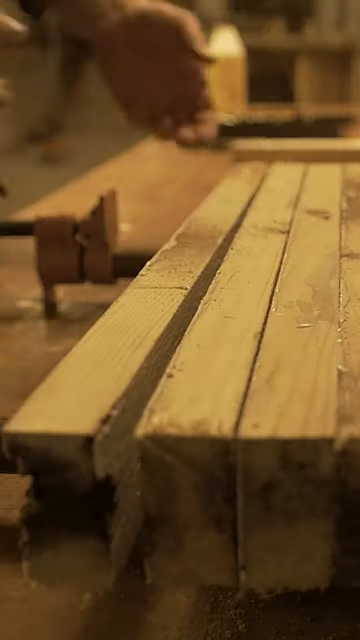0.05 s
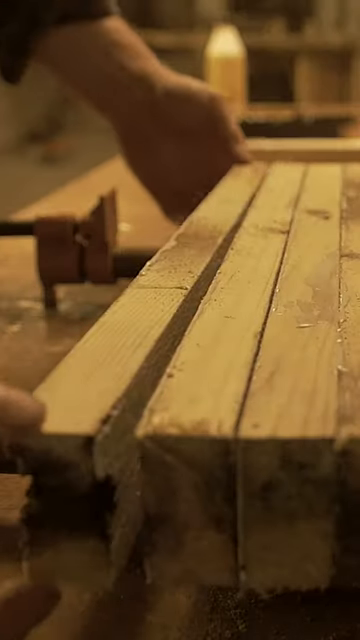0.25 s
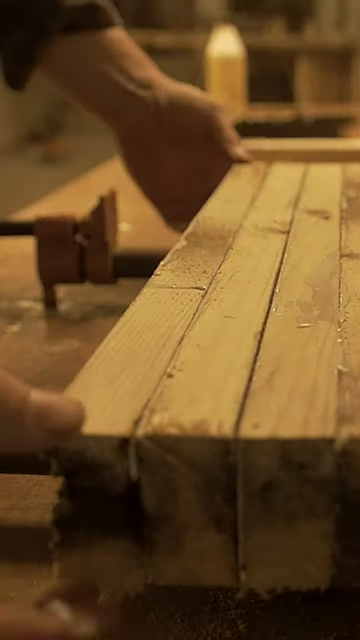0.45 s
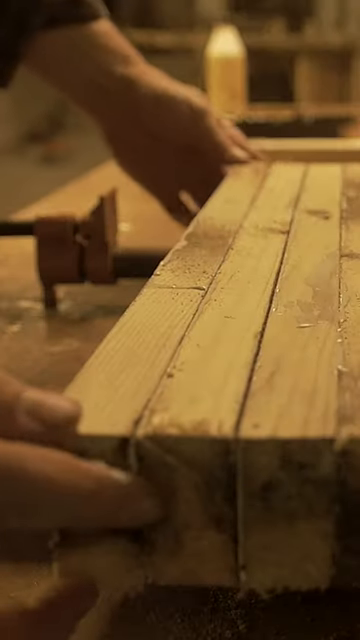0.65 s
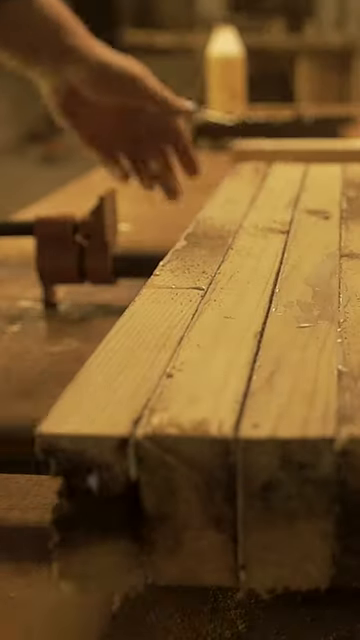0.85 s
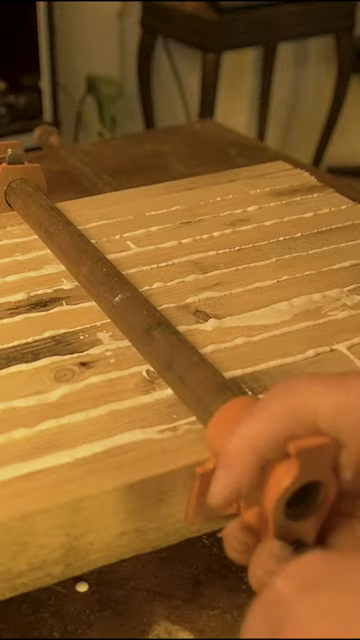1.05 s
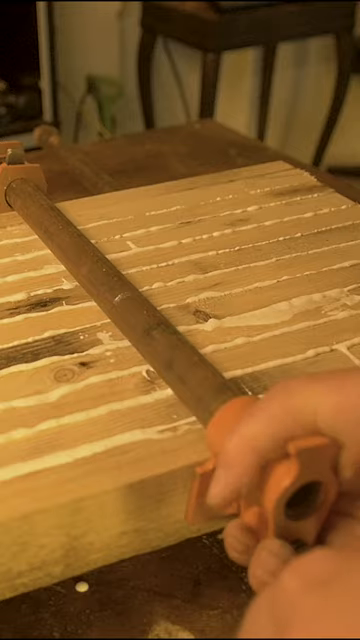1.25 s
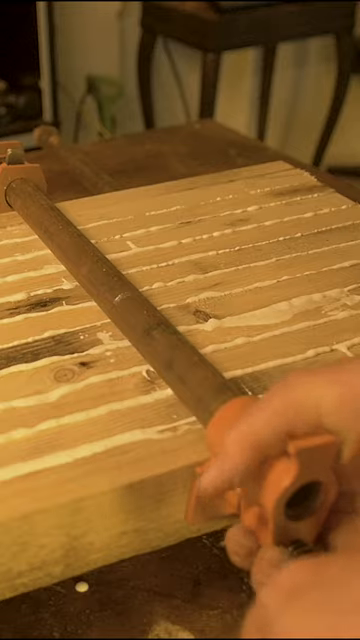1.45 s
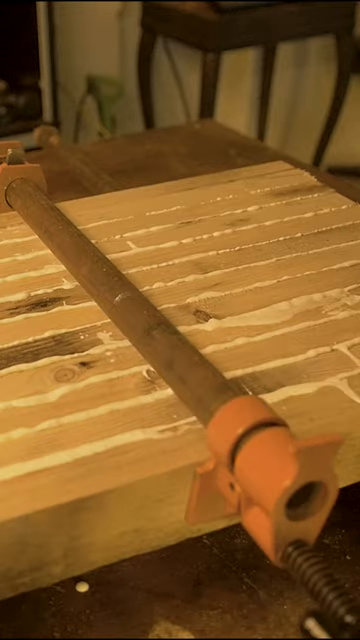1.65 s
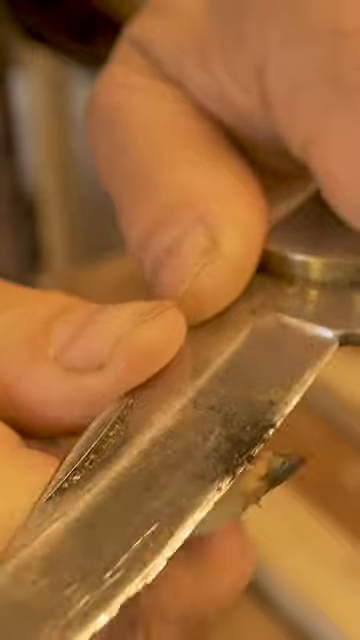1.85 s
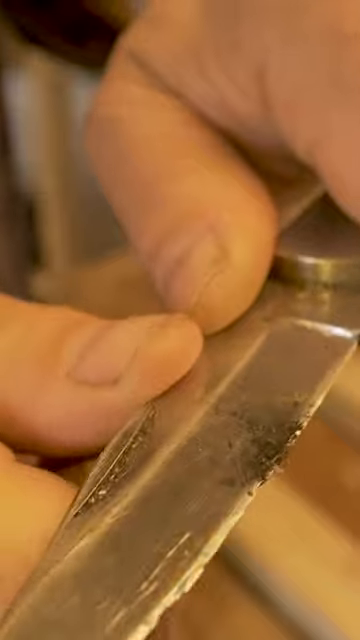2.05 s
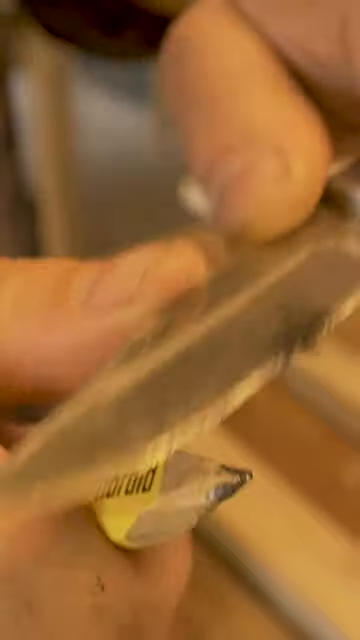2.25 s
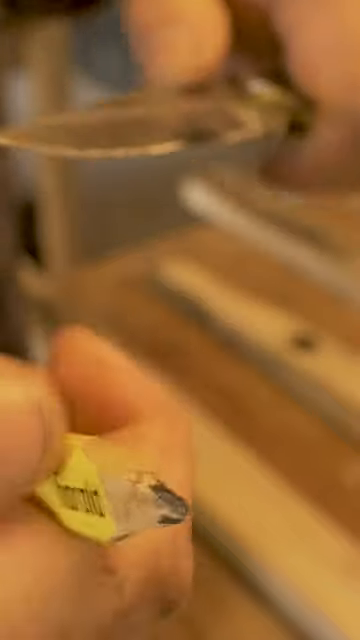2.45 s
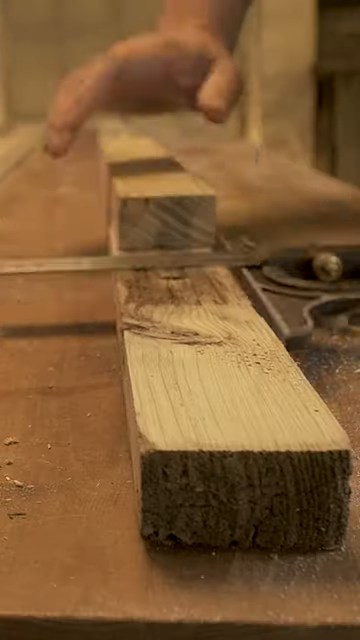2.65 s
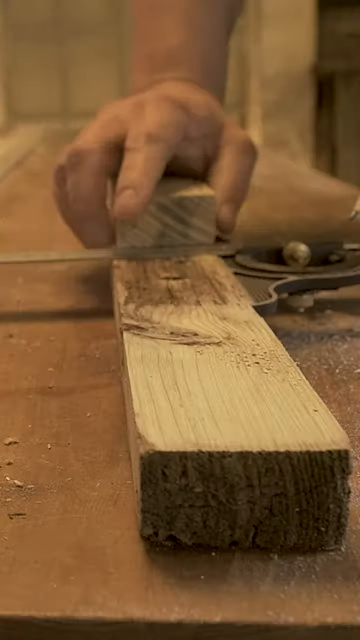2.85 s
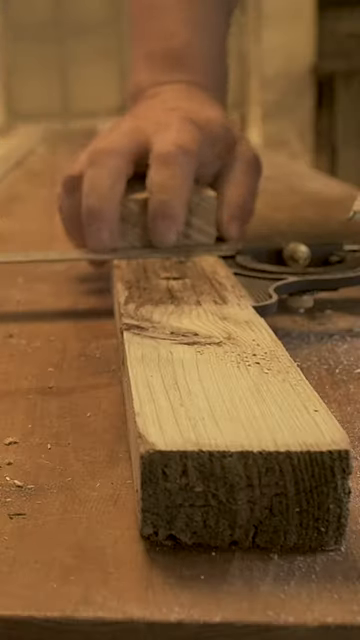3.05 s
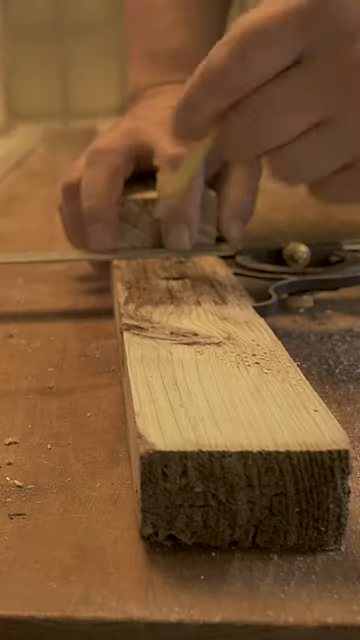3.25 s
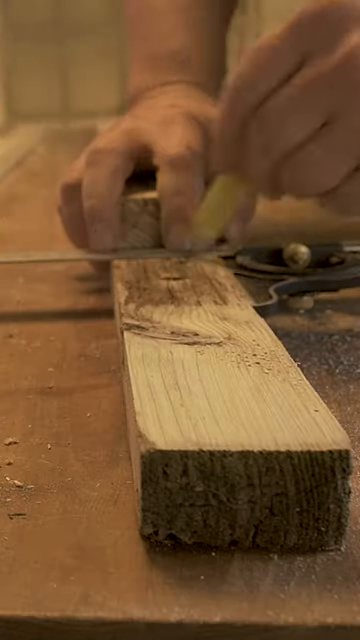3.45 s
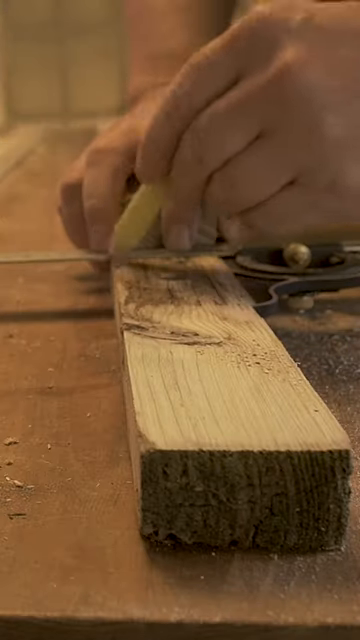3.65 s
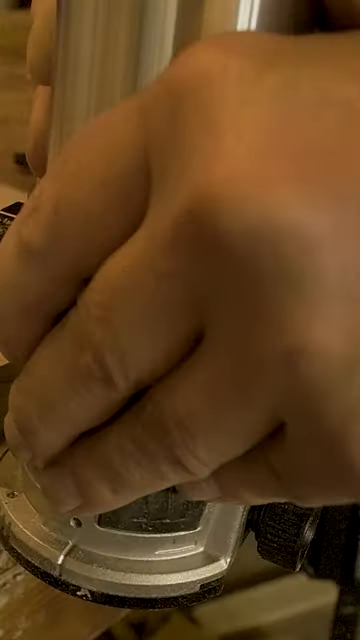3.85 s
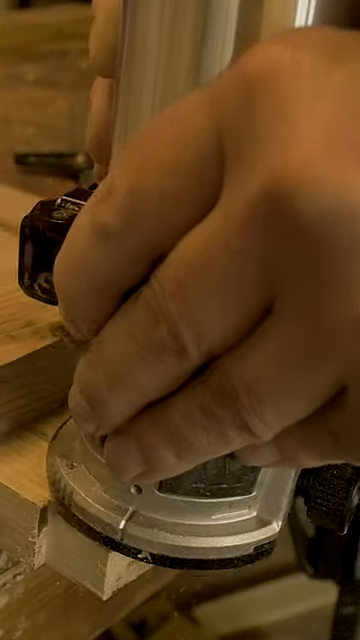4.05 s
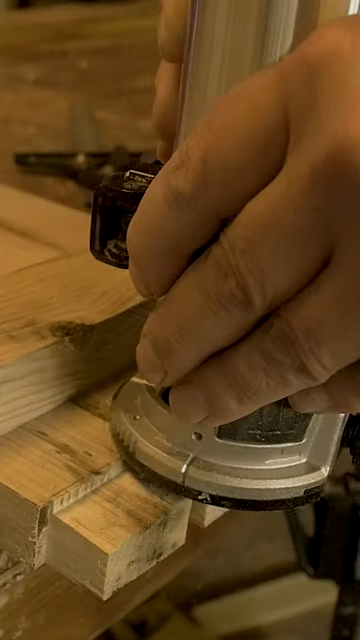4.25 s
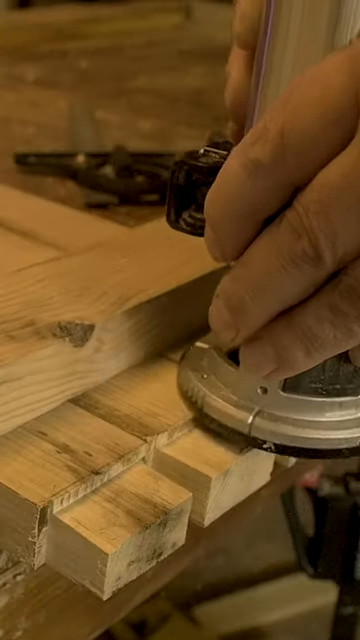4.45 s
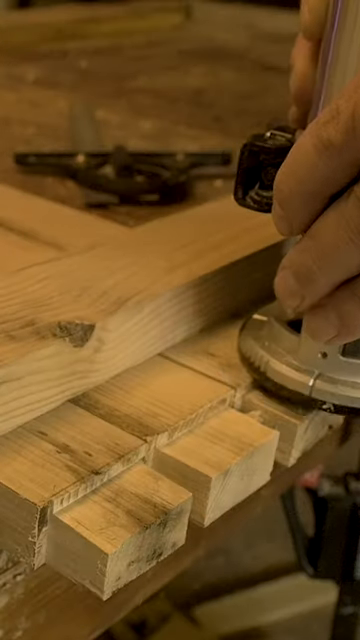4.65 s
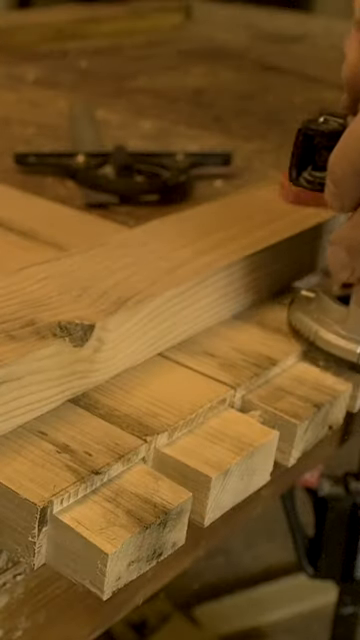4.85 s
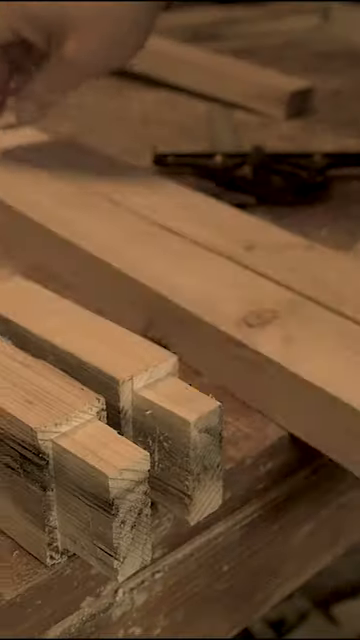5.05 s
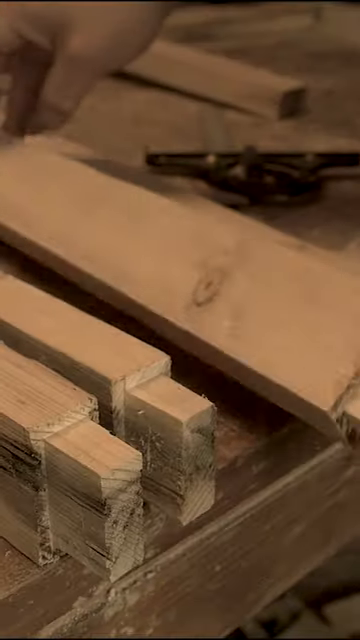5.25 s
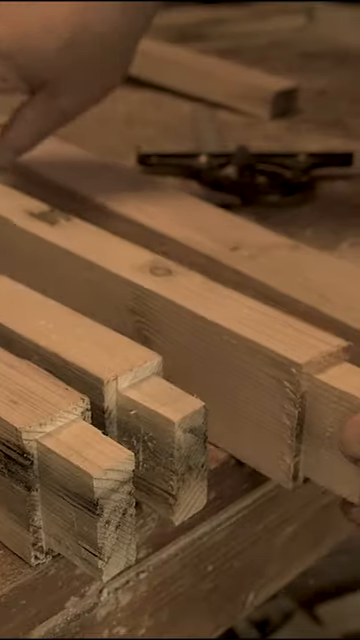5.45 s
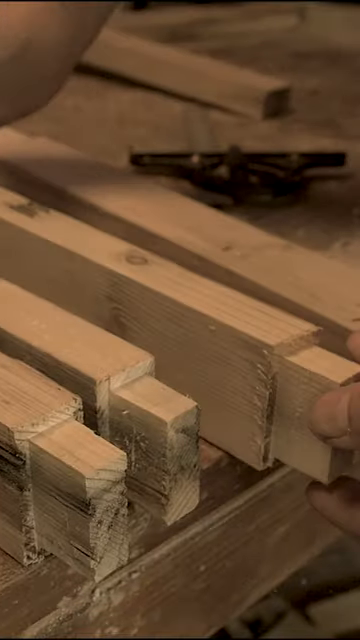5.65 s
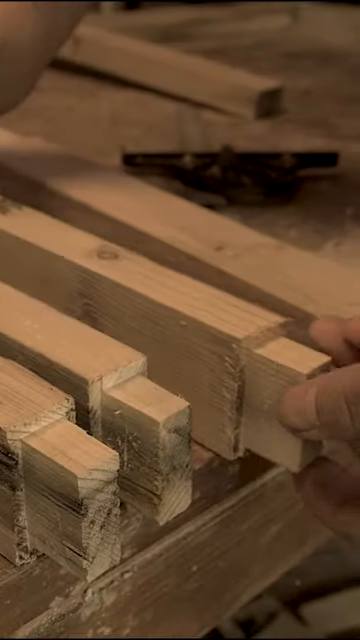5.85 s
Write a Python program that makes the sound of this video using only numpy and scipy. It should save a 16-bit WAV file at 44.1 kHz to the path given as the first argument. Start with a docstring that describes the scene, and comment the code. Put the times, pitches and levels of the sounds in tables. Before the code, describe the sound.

Soft timber thuds, clicks and sharp knocks under twittering birds, a hard cut to a whining router, then a heavy wooden clatter.

```python
"""Timber workshop with an open door

Boards, clamps and tools are handled close by in short work steps joined by hard cuts: rough pushes ring the
modes of a beam and of small parts. Timber drags, a router roars past over whining shaft multiples, and a
beam drops on the bench. Birds outside sing sine slides blurred by echoes, except during the router step;
shaped noise gives the low rumble, air, far birds and hiss, and a faint hum colours the first step.
"""
import sys
import numpy as np
from scipy import signal
from scipy.fft import rfft, irfft
from scipy.io import wavfile
from scipy.ndimage import uniform_filter1d, map_coordinates

SR = 44100
rng = np.random.default_rng(int(sys.argv[2]) if len(sys.argv) > 2 else 0)


def to_wav(s):
    """Save 16-bit WAV."""
    ch = np.atleast_2d(s).T  # columns
    pcm = np.round(np.clip(ch, -1, 1) * 32767)  # PCM
    wavfile.write(sys.argv[1], SR, pcm.astype(np.int16))


N = 261072
TIME = np.arange(N) / SR   # s

# Jumps to the next work step, where ringing stops. Each entry: time in seconds.
CUTS = [.975, 3.7765, 5.079]

# Background air. One list per work step; each row: time in seconds, then the relative levels of the
# far bird chorus, room air, hiss and low murmur, all in dB.
AIR = [
    [(0.0, -58.5, -57.5, -58, -79), (0.552, -62.5, -62, -64, -74.5), (0.96, -60, -61, -63.5, -80)],
    [(0.99, -65, -60.5, -60, -56.5), (1.42, -69, -61.5, -60.5, -56), (1.59, -60, -60, -55, -62),
     (2.36, -55.5, -61, -60, -61.5), (2.67, -65.5, -58, -55, -59), (3.03, -53.5, -62.5, -61, -68.5),
     (3.47, -61, -61.5, -56.5, -58.5)],
    [(5.09, -59, -49.5, -51.5, -71), (5.434, -51, -64.5, -60, -35.5), (5.92, -51.5, -53, -58, -68)],
]
# Colour of the background. Each row: frequency in Hz, relative level in dB per Hz.
OUTDOORS = [(20, -13), (91, -3), (297, -5), (368, -9), (848, -7.5), (1900, -11), (3930, -8.5), (5880, -17),
            (15500, -25.5)]
# Likeness of the two microphones in the background. Each row: frequency in Hz, left-right likeness from -1 to 1.
LIKENESS = [(60, 0.67), (240, 0.42), (950, 0.36), (3770, 0.14), (15000, -0.21)]
RUMBLE_DB = -63.5
HUM_HZ, HUM_DB = 385, -71.5   # a faint hum and its octave in the first step

# Nearer bird notes. Each row: start in seconds, shape, relative level in dB.
NOTES = [(0.293, "drop", -60.5), (0.324, "drop", -62.5), (.385, "lift", -64), (.595, "rise", -66),
         (.675, "pip", -75), (1.585, "slide", -64), (1.531, "lift", -57), (1.622, "lift", -54.5),
         (1.9, "hold", -75), (2.28, "hold", -62), (2.545, "drop", -66), (2.465, "sweep", -72),
         (2.19, "warble", -59.5), (2.94, "warble", -63), (3.055, "chip", -58.5), (3.175, "chip", -62),
         (2.045, "sweep", -64), (2.172, "sweep", -63), (2.106, "slide", -56), (2.213, "slide", -61),
         (2.31, "climb", -60.5), (2.355, "whistle", -62), (2.425, "chip", -58), (2.497, "whistle", -60),
         (2.505, "slide", -59), (2.618, "slide", -60.5), (2.691, "lift", -58.5), (2.758, "rise", -62),
         (2.825, "lift", -58), (2.902, "rise", -59.5), (2.994, "lift", -58.5), (3.043, "rise", -57.5),
         (3.093, "slide", -59.5), (3.229, "lift", -60.5), (3.344, "lift", -61), (5.09, "pip", -59),
         (5.144, "drop", -53.5), (5.205, "pip", -59), (5.261, "drop", -54), (5.463, "chip", -53),
         (5.505, "chip", -51.5), (5.535, "whistle", -64), (5.668, "whistle", -55.5), (5.601, "chip", -53),
         (5.723, "drop", -55), (5.74, "pip", -66), (5.79, "drop", -65), (5.866, "lift", -55.5),
         (5.865, "pip", -63)]
# Shapes of bird notes. Each name: length in seconds, start pitch in Hz, end pitch in Hz.
NOTE_SHAPES = {"drop": (0.034, 5500, 3200), "slide": (0.025, 6800, 4300), "rise": (0.0244, 5280, 6650),
               "lift": (0.0325, 3750, 4500), "pip": (0.024, 6950, 6820), "warble": (0.08, 4150, 4400),
               "chip": (0.026, 3800, 3680), "whistle": (0.0367, 4800, 5250), "sweep": (0.022, 8000, 6200),
               "climb": (.055, 5050, 5750), "hold": (0.134, 3780, 3900)}
FLOCK_DB = -6.5   # the whole far flock, echoes included

# Workshop echoes: fade time of the bass, level, and pitch above which they die sooner
SHOP_T60_S, SHOP_DB, SHOP_DULL_HZ = 0.15, -8, 2520

# Contacts on wood. Each row: start in seconds, kind, wood level in dB, scuff hiss level in dB,
# fade in ms, favoured beam pitch in Hz.
CONTACTS = [(0.104, "tick", -30, -49, 15.5, 640), (0.188, "scuff", -52, -36.5, 25.6, 587),
            (0.804, "tick", -36.5, -56, 7.3, 1040), (0.839, "tick", -44, -53.5, 11, 295),
            (0.964, "rap", -32, -47, 3.9, 480), (1.03, "thud", -34.5, -59, 32, 302),
            (1.062, "thud", -40, -62, 22, 348), (1.113, "thud", -30, -68, 42, 306),
            (1.389, "knock", -16, -32, 14.8, 540), (1.438, "tick", -36.5, -51.5, 49, 775),
            (1.546, "thud", -36, -59, 26, 317), (1.756, "thud", -33.5, -54, 18, 245),
            (1.791, "tick", -36.5, -36.5, 26, 740), (1.814, "tick", -35, -45, 29, 770),
            (2.092, "scuff", -62, -39.5, 19, 304), (2.273, "scuff", -61, -44.5, 22, 300),
            (2.588, "thud", -25.5, -46, 13.6, 160), (2.614, "scuff", -33, -54, 30, 200),
            (2.664, "thud", -26, -54, 6.2, 156), (2.78, "thud", -21, -52, 6.5, 173),
            (2.781, "tick", -39, -62, 24, 404), (2.814, "knock", -31.5, -57, 5.8, 420),
            (3.494, "rap", -30.5, -31.5, 13, 760), (3.508, "knock", -15.5, -32.5, 11, 394),
            (3.525, "tick", -18, -37, 17, 250), (3.535, "tick", -34, -23, 13.2, 472),
            (3.619, "rap", -31.5, -35.5, 7.9, 594), (3.643, "tick", -32, -58, 8.1, 284),
            (3.705, "knock", -40, -52, 61, 400), (3.74, "thud", -22, -42, 30, 385),
            (3.758, "knock", -10, -36, 22, 408), (5.224, "thud", -33, -42, 16, 620),
            (5.341, "drop", 3.5, -30, 17.6, 361), (5.385, "drop", -8, -38.5, 29, 352),
            (5.41, "drop", -6.5, -40, 21, 418), (5.48, "drop", -21, -50, 30, 607)]
# Kinds of contact. Each name: share to the beam in dB, share to the small parts in dB, rise in ms,
# focus on the favoured beam pitch in dB per octave.
KINDS = {"tick": (-36, 4.5, 4.5, 7), "thud": (-1.5, -58, 4, 34.5), "rap": (3, 5.9, 4, 41),
         "knock": (0.5, -4, 23.5, 14), "scuff": (-21, -11.5, 8, 31), "drop": (2, -12.5, 12, 18.5)}
# Modes of the beam. Each row: frequency in Hz, relative level in dB, free ring time (t60) in seconds.
BEAM = [(159, -6, 0.31), (211.3, 1, 0.2), (312, -6.5, 0.38), (354, 2, 0.18), (382.5, -2.5, 0.2),
        (481.5, 0, 0.12), (560, -4.5, 0.29), (617, -6, 0.36), (830, -11, .3)]
# Modes of blocks, jaws and tools. Each row: frequency in Hz, relative level in dB, free ring time in seconds.
SMALL_PARTS = [(866, 2.5, 0.091), (1103, 9, 0.047), (1336, 5, 0.061), (2200, -4.5, 0.027),
               (2475, 8.5, 0.022), (4540, 15, 0.031)]
# Colour of the scuff hiss. Each row: frequency in Hz, relative level in dB per Hz.
SCUFF = [(880, -65), (1500, 6.5), (1840, 3.5), (5190, -5), (11300, -4.5), (15500, -17)]
BEAM_DAMPING, PART_DAMPING = .25, .28   # share of the free ring time left when hands and bench hold the wood
LOOSE_RING, LOOSE_HZ = 2.6, 1346   # a dropped beam rings this many times longer and favours this part pitch
# The bench booms densely under a dropped beam: level below the wood, fade time, band edges
BENCH_DB, BENCH_T60_S, BENCH_HZ = -19, 0.54, (189, 704)

# Timber dragged over the bench. Each row: start in seconds, end in seconds, relative beam rumble at the start
# in dB, at the end in dB, favoured pitch in Hz, rub in the small parts in dB.
DRAGS = [(2.394, 3.299, -44.5, -52.5, 214, -74), (5.078, 5.211, -37, -43, 154, -86),
         (5.204, 5.37, -39, -47, 159, -49.5), (5.612, 5.766, -48, -40, 356, -51),
         (5.843, 5.921, -50, -24, 155, -49.5)]

# The router pass. Each row: time in seconds, relative air and cutter noise in dB, left-right difference in dB,
# shaft tone in dB, commutator whine in dB.
ROUTER = [(3.8, -30, 0.0, -38, -45), (4.3, -30, -1, -45, -44), (4.65, -30.5, -4.5, -52, -44),
          (4.8, -30.5, -3, -56.5, -42.5), (5.06, -31.5, -4, -53, -41)]
# Commutator whine. Each row: shaft multiple, relative level in dB.
WHINE = [(8, -6), (12, 0), (16, -6), (24, -4)]
# Colour of the router's roar. Each row: frequency in Hz, relative level in dB per Hz.
ROAR = [(150, -50), (445, -37), (490, -15.5), (894, -9.5), (2600, -1.5), (3350, -6), (5650, -8.5),
        (10700, -6), (14300, -16.5)]
# Housing resonances in the roar. Each row: frequency in Hz, width in Hz, mean level in dB.
HOUSING = [(875, 6.4, -24), (1283, 20, -22), (1760, 260, -10), (2930, 59, -16), (3255, 28, -14)]
# Squeals under load. Each row: middle in seconds, length in seconds, multiple of the cutting rate, mean level in dB.
SQUEALS = [(4.25, .26, 10, -42), (4.81, .24, 18, -39), (4.79, .12, 19, -38), (4.91, .08, 19, -39),
           (4.93, .12, 21, -42)]
SHAFT_HZ = 496.7
CUTTER_HZ, CUTTER_REPEAT = 493.5, .3   # the treble of the roar partly repeats itself each turn
LEFT_LEAD_MS = (-1.03, 0.784)   # lead of the left microphone at the start and the end of the pass
# A dull reflection off the beams (gain, delay at both ends) cuts valleys that move up along the pass
GLANCE, GLANCE_MS = -.45, (.44, .37)
# Narrow bands flare up in the cut: level against the roar colour, width, swing, rate of change
GRAIN_DB, GRAIN_WIDTH_HZ, GRAIN_SWING_DB, GRAIN_PER_S = -15, 24, 5, 14

NOTCH_HZ, NOTCH_WIDTH_HZ = 7855, 70   # dip in the microphone's treble
CUTOFF_HZ = 15900


def amp(db):
    """dB to gain."""
    return 10 ** (np.asarray(db) / 20)


def rms_one(x):
    """Scaled to rms 1 over the last axis-free whole."""
    return x / np.sqrt(np.mean(x ** 2) + 1e-20)


def in_time(rows, outside=-120):
    s, *columns = np.transpose(rows)
    return np.array([np.interp(TIME, s, column, outside, outside) for column in columns])


def at_hz(points, hz):
    """A spectrum read on a log-frequency axis."""
    point_hz, value = np.array(points).T
    return np.interp(np.log(np.maximum(hz, 1)), np.log(point_hz), value)


def drift(rate):
    """Smooth chance of spread near 1, with this many random knots per second."""
    knots = rng.standard_normal(int(N / SR * rate) + 3)
    return map_coordinates(knots, [TIME * rate], order=3)


def coloured(spectrum, low_hz=20, high_hz=16000, channels=2):
    """Unrelated noises shaped by a spectrum inside soft edges, scaled to rms 1."""
    hz = np.arange(N // 2 + 1) * SR / N + 1e-3
    edges = np.sqrt((1 + (low_hz / hz) ** 8) * (1 + (hz / high_hz) ** 8))
    shape = amp(at_hz(spectrum, hz)) / edges
    return rms_one(irfft(rfft(rng.standard_normal((channels, N))) * shape, N))


def spread(pair):
    """Two unrelated noises become left and right, alike in the bass."""
    mid, side = rfft(pair)
    alike = np.clip(at_hz(LIKENESS, np.arange(len(mid)) * SR / N), -.95, .95)
    shared = np.sqrt((1 + alike) / 2) * mid
    opposed = np.sqrt((1 - alike) / 2) * side * [[1], [-1]]
    return irfft(shared + opposed, N)


def background():
    """Rumble, murmur, air, the blur of the farthest birds and hiss are slowly wavering noise; the hum is two sines."""
    chorus_db, air_db, hiss_db, low_db = in_time(sum(AIR, []), None)
    chorus = coloured(OUTDOORS, 2800., 5600.) * amp(chorus_db - 8 + 3 * drift(14))
    rumble = coloured(OUTDOORS, 5.8, 94.0) * amp(RUMBLE_DB + 2.0 * drift(4.17))
    low = coloured(OUTDOORS, 92.0, 444.0) * amp(low_db + 3.1 * drift(11.0))
    air = coloured(OUTDOORS, 420.0, 2870.0) * amp(air_db + 1.0 * drift(9.5))
    hiss = coloured(OUTDOORS, 4180.0) * amp(hiss_db + 2.3 * drift(16.0))
    turn = 2 * np.pi * HUM_HZ * TIME
    hum = amp(HUM_DB + 3 * drift(8)) * (np.sin(turn) + np.sin(2 * turn)) * (TIME < CUTS[0])
    return hum + spread(rumble + low + air + chorus + hiss)


def shop_echoes():
    """Dense echoes, unrelated left and right; the treble dies sooner."""
    t = np.arange(int(.6 * SR)) / SR
    noise = rng.standard_normal((2, len(t))) * np.minimum(t / 0.0057, 1)
    dull = signal.sosfilt(signal.butter(1, SHOP_DULL_HZ, fs=SR, output="sos"), noise)
    tail = dull * amp(-60 * t / SHOP_T60_S) + (noise - dull) * amp(-60 * t / (0.4 * SHOP_T60_S))
    return tail / np.sqrt(np.sum(tail ** 2, axis=1, keepdims=True))


def shop(dry, echoes):
    """Direct sound plus the decaying echoes of the workshop."""
    wet = signal.fftconvolve(dry.mean(axis=0)[None], echoes, axes=1)
    return dry + amp(SHOP_DB) * wet[:, :dry.shape[1]]


def sing(notes):
    """Rows of start s, length s, start Hz, end Hz, relative dB become soft-ended, quavering sine slides."""
    out = np.zeros((2, N))
    for s, length, start_hz, end_hz, level_db in notes:
        u = np.linspace(0, 1, int(length * SR))   # progress through the note
        quaver = 1 + .03 * np.sin(2 * np.pi * (65 * length * u + rng.random()))
        hz = (start_hz + (end_hz - start_hz) * u) * quaver
        note = np.sin(np.pi * u) * np.sin(2 * np.pi * np.cumsum(hz) / SR)
        side_db = rng.normal(0, 0.31) * np.array([[1], [-1]])
        start = int(s * SR)
        out[:, start:start + len(u)] += amp(level_db + 8.5 + side_db) * note
    return out


def birds(echoes):
    """Nearer notes lean slightly to a side each; a far flock twitters at random; the shop's echoes smear all."""
    chorus_db = in_time(sum(AIR, []), None)[0]
    when, length, pitch, slide, loud = rng.random((1000, 5)).T
    when = when * (N / SR - .1)
    start_hz = 3600 + 900 * pitch
    end_hz = start_hz * (1 + 0.55 * (slide - .6))
    level_db = chorus_db[(when * SR).astype(int)] - 3 - 10 * loud
    flock = np.transpose([when, 0.01405 + 0.0284 * length, start_hz, end_hz, level_db])
    near = sing([(s, *NOTE_SHAPES[shape], db) for s, shape, db in NOTES])
    far = sing(flock)
    out = shop(near, 1.9 * echoes) + amp(FLOCK_DB) * shop(far, 1.6 * echoes)
    return out * ((TIME < CUTS[1]) | (TIME > CUTS[2]))   # none in the router step


def soften(x, hz):
    """A yielding contact pushes without treble."""
    return signal.sosfilt(signal.butter(3, hz, fs=SR, output="sos"), x)


def favour(modes, focus_hz, db_per_octave):
    """Where a board is struck decides which of its modes speak."""
    favoured = []
    for hz, level_db, t60 in modes:
        loss_db = min(db_per_octave * np.abs(np.log2(hz / focus_hz)), 26.0)
        favoured.append((hz, level_db - loss_db, t60))
    return favoured


def ring(push, modes, share, spread_db):
    """Every mode, a two-pole resonator, answers the push with a strength of its own at each microphone."""
    out = 0
    for hz, level_db, t60 in modes:
        r = amp(-60 / (t60 * share * SR))   # decay per sample
        w = 2 * np.pi * hz / SR
        gain = amp(level_db + spread_db * rng.standard_normal((2, 1)))
        out = out + gain * signal.lfilter([1, 0, -1], [1, -2 * r * np.cos(w), r * r], push + 1e-18)
    return out


def contacts(echoes):
    """Each contact is a rough push that swells and fades; it rings the beam and the small parts and scuffs."""
    out = np.zeros((2, N))
    hiss = coloured(SCUFF, 2010.0)
    ms = np.arange(int(.6 * SR)) / SR * 1000
    for s, kind, wood_db, scuff_db, fade_ms, focus_hz in CONTACTS:
        beam_db, part_db, rise_ms, focus_db = KINDS[kind]
        dropped = kind == "drop"
        start = int(s * SR)
        end = min([start + len(ms), N] + [int(c * SR) for c in CUTS if c > s])
        length, span = end - start, slice(start, end)

        swell = np.minimum(ms / rise_ms, 1)
        fade = np.exp(-(np.maximum(ms - rise_ms, 0) / fade_ms) ** 1.37)
        shape = swell ** (1.6 if dropped else 0.56) * fade
        shared, *own = rng.standard_normal((3, len(ms)))
        own = np.array(own)   # the two microphones face different parts of the board
        push = shape * (shared + 1.37 * own)

        loose, part_hz = (LOOSE_RING, LOOSE_HZ) if dropped else (1, 3.0 * focus_hz)
        beam_modes = favour(BEAM, focus_hz, focus_db)
        part_modes = favour(SMALL_PARTS, part_hz, 23.0)
        beam = ring(soften(push, 700.), beam_modes, BEAM_DAMPING * loose, 2.5)
        part = ring(soften(push, 3900.0), part_modes, PART_DAMPING * loose, 3.6)
        for body, level_db in ((beam, beam_db), (part, part_db)):
            body = shop(body, echoes)[:, :length]
            out[:, span] += amp(wood_db + level_db) * body / np.abs(body).max()

        if dropped:
            band = signal.butter(2, BENCH_HZ, "band", fs=SR, output="sos")
            boom = rms_one(signal.sosfilt(band, shared + 1.33 * own))
            boom = boom * swell * amp(-60 * ms / 1000 / BENCH_T60_S)
            out[:, span] += amp(wood_db + BENCH_DB) * boom[:, :length]
        grit = amp(scuff_db) * (shape * np.minimum(ms / 2.6, 1))[:length]
        out[:, span] += grit * hiss[:, span]
    return out


def drags():
    """Lumpy friction keeps the beam modes and one small part humming, and hisses."""
    curves = [in_time([(a, a_db, hz, rub), (b, b_db, hz, rub)]) for a, b, a_db, b_db, hz, rub in DRAGS]
    rumble_db, focus_hz, rub_db = np.max(curves, axis=0)
    friction = soften(rng.standard_normal((2, N)), 2000.0) * amp(6.3 * drift(27))
    beam = 0
    for mode in BEAM:
        octaves_off = np.abs(np.log2(mode[0] / np.maximum(focus_hz, 50)))
        beam = beam + rms_one(ring(friction, [mode], 0.56, 1.4)) * amp(-16.0 * octaves_off)
    rub = rms_one(ring(friction, [SMALL_PARTS[2]], 1.0, 4.9)) + coloured(SCUFF, 2060.0)
    rub_gain = uniform_filter1d(amp(rub_db), size=1800)   # soft starts and ends
    return amp(rumble_db - 8.5) * beam + rub_gain * rub


def patchy(x, slow_db, fast_db):
    """Third-octave bands swell and flutter on their own as the cutter meets changing grain."""
    spectrum, octave = rfft(x), np.log2(np.arange(N // 2 + 1) * SR / N + 1)
    out = 0
    for centre in np.arange(7, 14.5, 1 / 3):
        band = np.cos(np.pi / 2 * np.clip(3 * (octave - centre), -1, 1)) ** 2
        out = out + irfft(spectrum * band, N) * amp(slow_db * drift(4) + fast_db * drift(70))
    return out


def router_roar():
    """Noise through housing and grain resonances, combed by a reflection and by the cutter's turns."""
    roar, white = coloured(ROAR, channels=3), rng.standard_normal((3, N))
    for hz, width_hz, level_db in HOUSING:
        peak = signal.lfilter(*signal.iirpeak(hz, hz / width_hz, fs=SR), white)
        roar = roar + amp(level_db + 2.5 * drift(9.8)) * rms_one(peak)
    for hz in np.geomspace(750, 4300, 36) * rng.uniform(.97, 1.03, 36):
        peak = signal.lfilter(*signal.iirpeak(hz, hz / GRAIN_WIDTH_HZ, fs=SR), white)
        flare_db = GRAIN_DB + at_hz(ROAR, hz) + GRAIN_SWING_DB * drift(GRAIN_PER_S)
        roar = roar + amp(flare_db) * rms_one(peak)
    behind = np.arange(N) - np.interp(TIME, CUTS[1:], GLANCE_MS) * SR / 1000
    dull = uniform_filter1d(roar, size=7)
    roar = roar + GLANCE * np.array([np.interp(behind, np.arange(N), side) for side in dull])
    turns = np.arange(N // 2 + 1) * SR / N / CUTTER_HZ
    repeat = 1 - CUTTER_REPEAT * np.minimum(turns / 20, 1) * np.exp(-2j * np.pi * turns)
    return patchy(irfft(rfft(roar) / repeat, N), 1.2, 1.2)


def router():
    """Fan and cutter roar over shaft multiples and squeals; its level leans right as the lead between sides swings."""
    first, last = (CUTS[1], *ROUTER[0][1:]), (CUTS[2], *ROUTER[-1][1:])
    roar_db, pan_db, shaft_db, whine_db = in_time([first] + ROUTER + [last])
    turn = 2 * np.pi * np.cumsum(SHAFT_HZ * (1 + .0007 * drift(9))) / SR
    direct, left, right = router_roar() * amp(roar_db)
    lead = np.interp(TIME, CUTS[1:], LEFT_LEAD_MS) * SR / 1000
    late = map_coordinates(direct, [np.arange(N) - lead], order=3)
    # the walls return more than comes direct: unrelated noise at each microphone
    out = amp(-5) * np.array([direct, late]) + np.array([left, right])
    out += amp(shaft_db + 4 * drift(16)) * np.sin(turn + [[0], [.3]])
    for multiple, level_db in WHINE:
        phase = rng.uniform(0, 1.5, (2, 1))
        out += amp(whine_db + level_db + 2 + 2.5 * drift(11)) * np.sin(multiple * turn + phase)
    cut = 2 * np.pi * np.cumsum(CUTTER_HZ * (1 + .0015 * drift(25))) / SR
    for middle, length, multiple, level_db in SQUEALS:
        swell = np.sqrt(np.maximum(1 - (2 * (TIME - middle) / length) ** 2, 0))
        phase = rng.uniform(0, 3, (2, 1))
        out += swell * amp(level_db + 2.5 * drift(20)) * np.sin(multiple * cut + phase)
    return out * amp(pan_db * [[.5], [-.5]]) * ((TIME >= CUTS[1]) & (TIME <= CUTS[2]))


def scene():
    """All sources, left and right."""
    echoes = shop_echoes()
    return background() + birds(echoes) + contacts(echoes) + drags() + router()


def record(dry):
    """A narrow dip in the microphone's treble, overload on the loudest peaks, a steep top cut."""
    x = signal.lfilter(*signal.iirnotch(NOTCH_HZ, NOTCH_HZ / NOTCH_WIDTH_HZ, fs=SR), dry)
    overloaded = np.clip(x, -1, 1)
    x = signal.sosfilt(signal.cheby2(14, 80, CUTOFF_HZ, fs=SR, output="sos"), overloaded)
    return np.clip(x, -1, 1)


dry = scene()
out = record(dry)
to_wav(out)
```